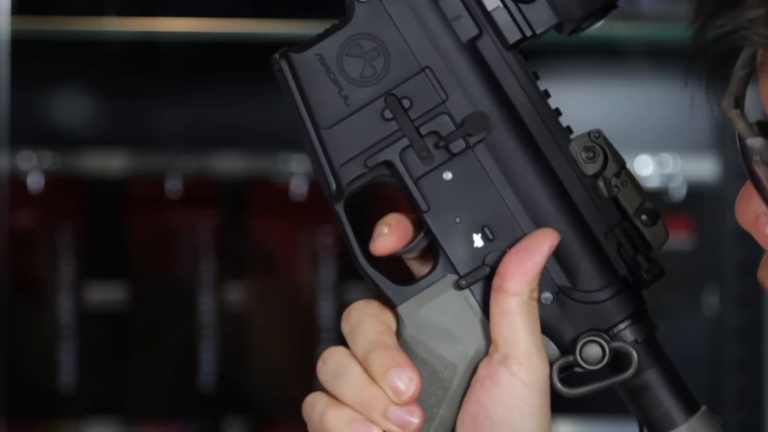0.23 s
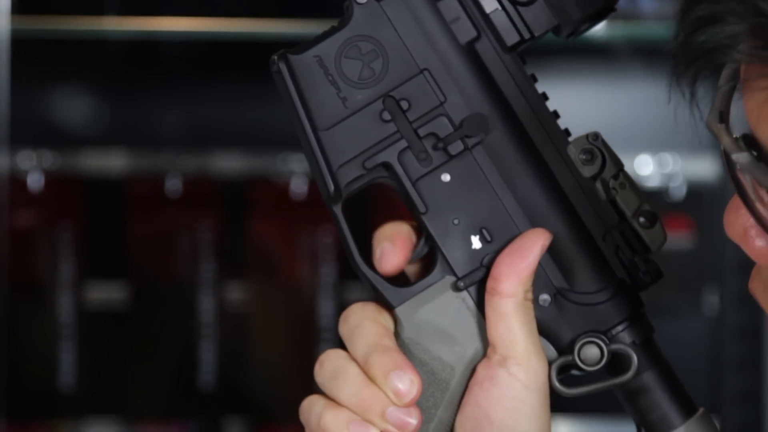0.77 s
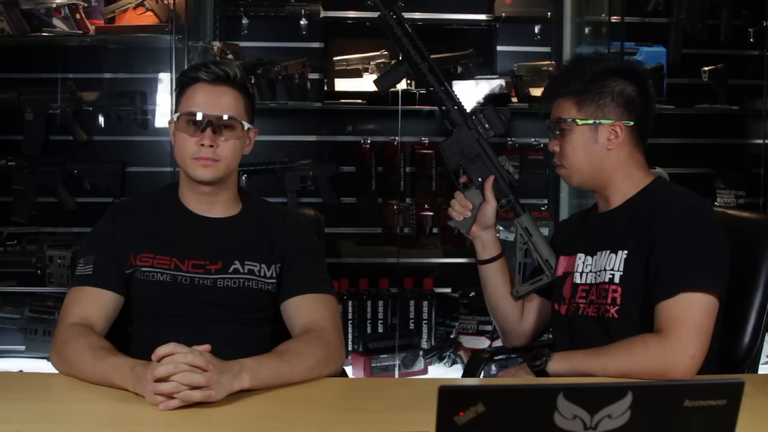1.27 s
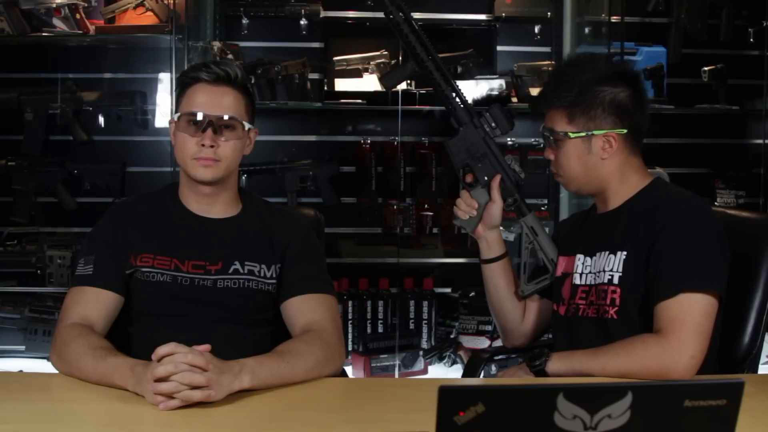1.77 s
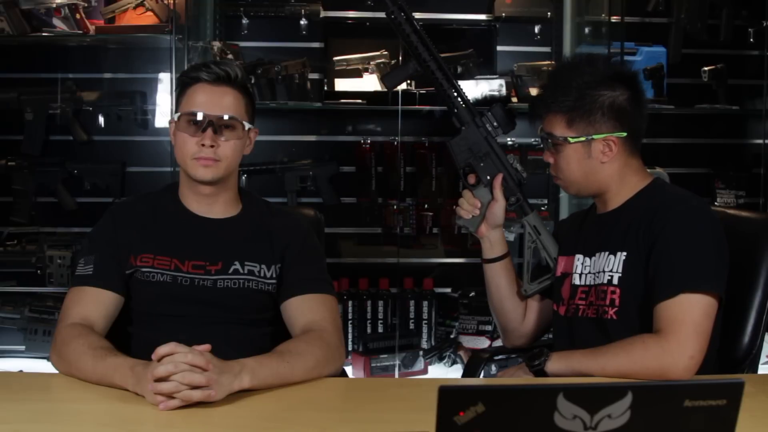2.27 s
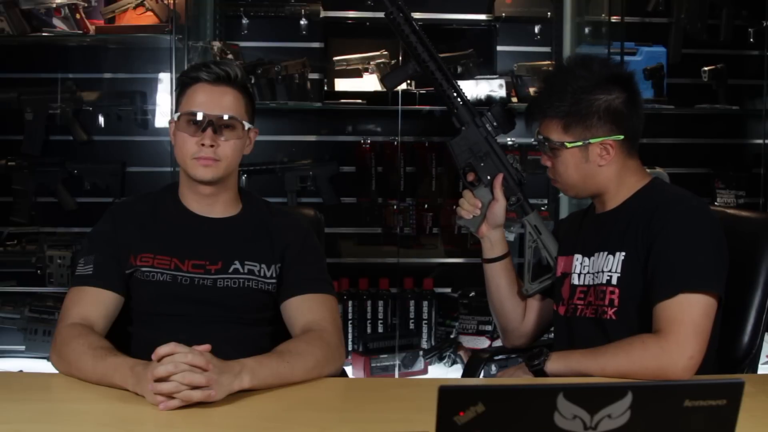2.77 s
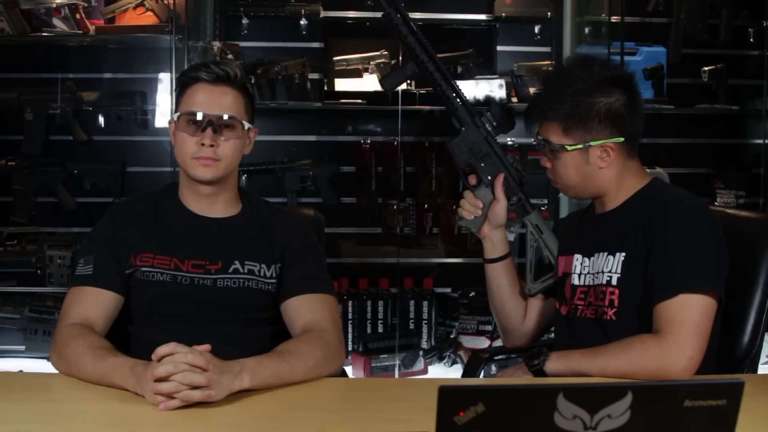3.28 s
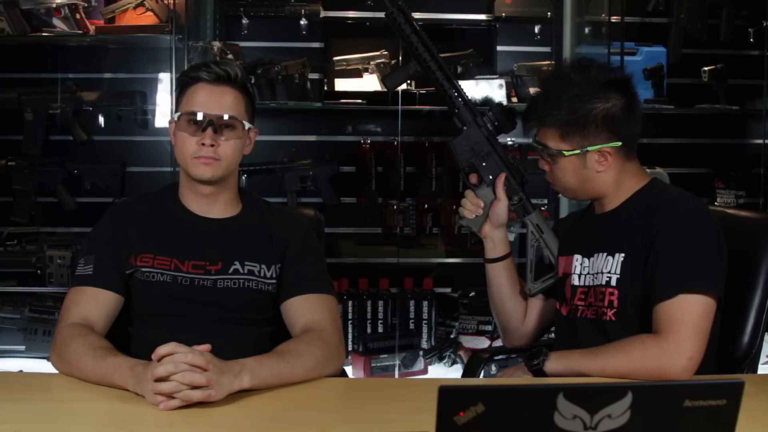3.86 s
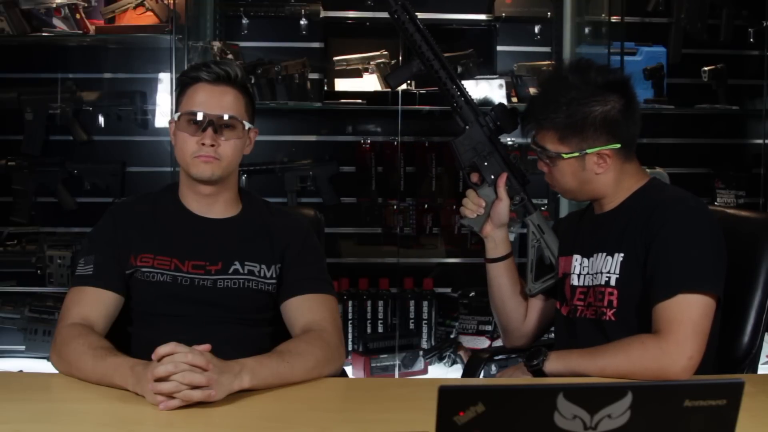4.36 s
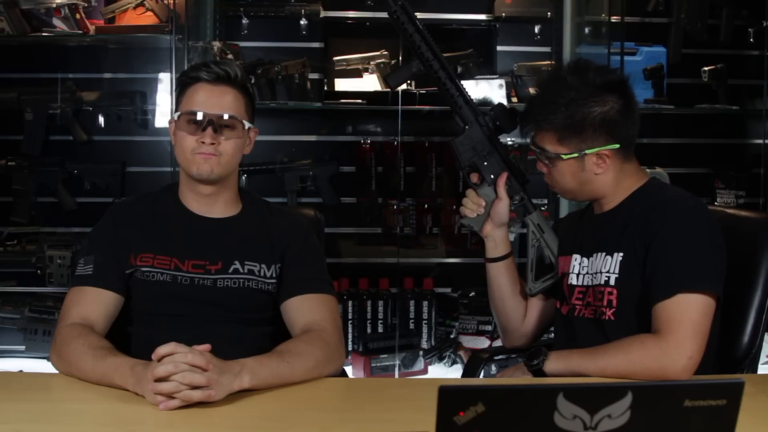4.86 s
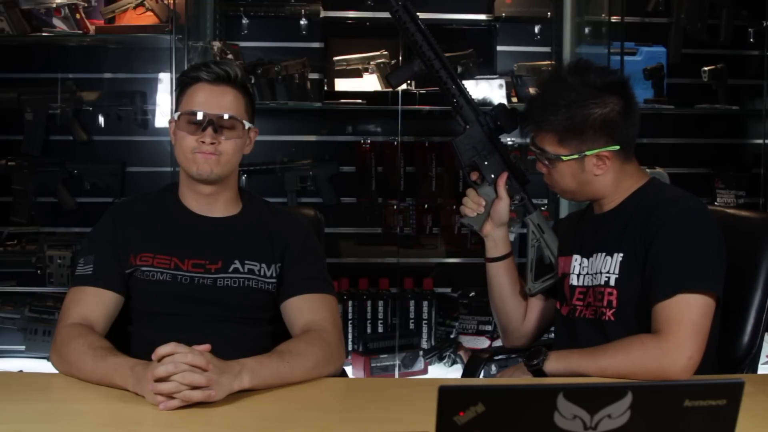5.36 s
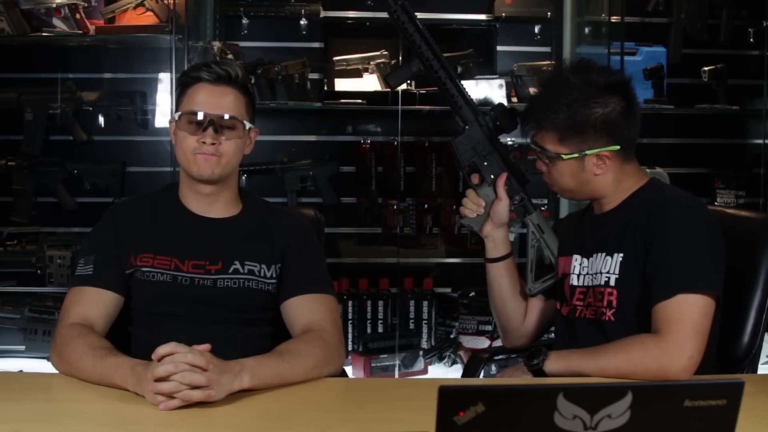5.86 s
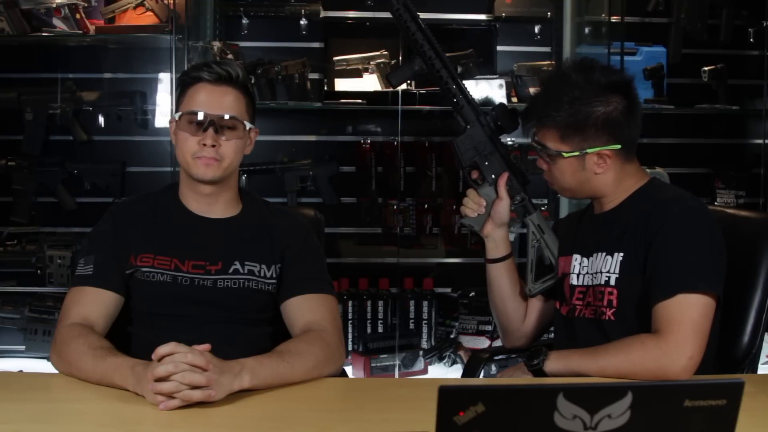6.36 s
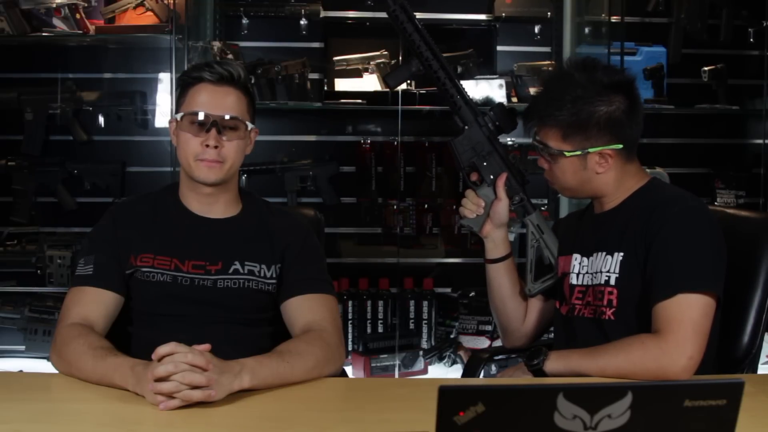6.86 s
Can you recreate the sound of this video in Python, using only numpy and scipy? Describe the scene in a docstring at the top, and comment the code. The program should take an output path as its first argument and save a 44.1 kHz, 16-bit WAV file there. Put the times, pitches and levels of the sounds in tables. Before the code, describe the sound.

Close, loud clacks and air pops from an electric airsoft rifle, triggered as fast as possible in a room with a short echo.

```python
"""A blip of gear whirr snaps into a hard clack: an electric airsoft rifle, close up in a shop room,
fired as fast as a finger can pull. Each shot, the gears wind the piston back, air hisses out, the piston
slams home and the gearbox rebounds. A pellet gives a pop; when none feeds, the open barrel rings instead.
The room answers with a short dense tail and the loud slams overload the input.
Underneath sit a faint room tone and a few soft low thuds."""
import sys
import numpy as np
from scipy import signal
from scipy.fft import rfft, irfft, next_fast_len
from scipy.io import wavfile
from scipy.ndimage import uniform_filter1d

SR = 44100
rng = np.random.default_rng(int(sys.argv[2]) if len(sys.argv) > 2 else 0)


def store_pcm(level_fs):
    """Save levels as 16-bit WAV."""
    pcm = np.round(np.clip(level_fs, -1, 1) * 32767).astype(np.int16)
    wavfile.write(sys.argv[1], SR, np.atleast_2d(pcm).T)


N = 314433

# trigger pulls: t/s, slam level/dB, gear level/dB, barrel ring against the slam/dB
SHOT_CUES = [(0.0206, 5.5, -15, -42), (0.1133, 3.5, -19.5, -38), (0.2378, 3.5, -19.5, -43),
             (0.3445, 4.5, -21, -34), (0.4762, 3.5, -18.5, -41), (0.5858, 2.5, -20.5, -60),
             (0.6993, 2, -21, -42), (0.8218, 2.5, -22.5, -41), (0.9422, 2.5, -19.5, -43),
             (1.073, 3.5, -19.5, -14.5), (1.175, 5.5, -16, -49), (1.2992, 8, -9.5, -34),
             (1.4216, 8, -9, -20), (1.5287, 6, -12.5, -20.5), (1.6473, 5, -15.5, -20),
             (1.7564, 4.5, -17, -28), (1.8683, 4.5, -18, -27), (1.9773, 3.5, -18, -21),
             (2.1011, 3.5, -18, -26), (2.2053, 2.5, -20, -22), (2.322, 3, -19.5, -26),
             (2.4336, 4, -19, -13), (2.5476, 2.5, -19, -13.5), (2.6629, 2.5, -19.5, -24),
             (2.7785, 3, -20, -20), (2.8909, 2.5, -20.5, -25), (3.0065, 3, -20, -29),
             (3.1203, 5.5, -20.5, -14), (3.2341, 2.5, -18, -13.5), (3.348, 1, -21.5, -25),
             (3.5762, 4.5, -18.5, -14), (3.7035, 3.5, -19.5, -22), (3.8217, 2.5, -19.5, -13.5),
             (3.9487, 2, -19, -24), (4.081, 2.5, -21.5, -24), (4.206, 1.5, -20.5, -28),
             (4.3236, 2.5, -21, -34), (4.4519, 2.5, -20.5, -13.5), (4.5676, 2, -20, -39),
             (4.689, 2.5, -21, -14), (4.813, 1.5, -21.5, -21), (5.1559, 5.5, -18, -22),
             (5.2806, 4.5, -15.5, -21), (5.5118, 4.5, -15, -18), (5.659, 5, -15, -13),
             (5.7927, 2.5, -18, -21), (5.9408, 4, -17, -25), (6.0735, 2.5, -19, -20),
             (6.339, 4.5, -19, -24), (6.5008, 3.5, -17, -20), (6.6466, 3.5, -18, -13.5),
             (6.807, 3, -18, -28), (6.9625, 4, -18, -15), (7.11, 3, -18.5, -34)]
# how the balance of each shot drifts over time, shifting after the first string: # t/s, pop f/Hz, then pop/dB,
# thump/dB, knock/dB against the slam, whine/dB against the gears
TONE_OVER_TIME = [(0, 1080, -1.5, -25.5, -9.5, -1), (.95, 1020, 0.5, -25, -9, -1), (1.2, 1060, 1.5, -29, -13.5, -7),
                  (1.28, 984, -1.5, -22, -17.5, -5.5), (2.8, 982, -1.5, -22, -20, -7.5),
                  (4.6, 962, -2.5, -23, -21, -13), (5.4, 980, -1, -21, -19, -15), (7.2, 965, -2, -23, -21, -11)]
# shot-to-shot spread: pop/dB, thump/dB, knock/dB, whine/dB, rebound/dB
SPREAD_DB = [0.52, 0.84, 2.8, 3, 1.35]
# gear resonances in the shell: f/Hz, width/Hz, level/dB
GEAR_PEAKS = [(1030, 540, -4), (1380, 89, -26), (1920, 300, -15), (2464, 1300, 12), (3460, 43, -12),
              (4640, 43, -4), (5840, 250, -6.5), (7000, 130, -30)]
# tone curves: f/Hz, level/dB
GEAR_EQ = [(88, -63), (150, -41), (472, -13.5), (1030, -9.5), (3220, -9), (3620, -3), (6240, -12),
           (7150, -14.5), (15500, -22.5)]  # chattering teeth
AIR_EQ = [(180, -21), (300, -25), (484, 0.5), (969, 1.5), (2210, -3), (3400, 0.5), (5490, -4.5), (7390, -5),
          (9310, -15.5), (15500, -26.5)]  # escaping air
TAIL_EQ = [(60, -26), (300, 14), (450, 2.5), (700, 0.5), (1000, 2), (1400, 3), (2500, 2.5), (3250, 4),
           (3700, 5.5), (5000, 4.5), (8000, 4.5), (16000, 5)]  # the room's answer
ROOM_TONE_EQ = [(20, -19), (60, 1), (300, -5), (2000, -25), (6000, -45), (16000, -59)]  # the quiet room
# the piston head chatters on its pad: t/s after first contact, level/dB
PISTON_HITS = [(0, -1.5), (.0024, -13.5), (.0048, -20)]
# ringing modes: f/Hz, level/dB, t60/s
SHELL_MODES = [(1401, -9, 0.03), (1778, -6.5, 0.018), (2282, -5, 0.016), (2695, -2, 0.022),
               (3305, -1.5, 0.018), (3730, -10, 0.013), (4170, -7, 0.015), (4957, -6, 0.013),
               (5880, -6, 0.0078), (7790, -16, 0.0094)]  # gearbox shell
RECEIVER_MODES = [(770, -15, 0.082), (856, 1, 0.044), (1146, -18, 0.013), (1805, -5.5, 0.031),
                  (2110, -0.5, 0.037), (2563, 1, 0.053)]  # hollow side of the receiver
BARREL_MODES = [(359, -0.5, 0.022), (686, -5, 0.062), (1000, -4, 0.073), (1380, -4, 0.018),
                (1675, -37, 0.0101), (2340, -7, 0.071), (3654, 9, 0.026)]  # open barrel
STOCK_MODES = [(195, 6.5, 0.05), (475, -1, 0.031)]  # stock and grip
SPRING_MODES = [(1376, -6, 0.38), (1760, 4.5, 0.11), (2464, 5, 0.13), (2750, 6, 0.097), (3390, 4, 0.24),
                (3630, -19, 0.083)]  # thin metal of spring and guide
ROOM_MODES = [(111, 5, 0.079), (154.7, -7, 0.46), (204.7, -4.5, 0.23), (250.8, -5.5, 0.39), (234, 2, 0.35),
              (293, -10, 0.55), (369, -21, 0.61), (421.5, -14, 0.38), (444.6, 2.5, 0.16),
              (481.5, -7.5, 0.75), (527, -17, 0.79), (575, -2.5, 0.33), (588, -11.5, 0.58)]  # low end of the room
# cancellation near the table top: f/Hz, width/Hz, depth/0-1
TABLE_NOTCH = (316, 89, 0.65)
# decay of the room tail: f/Hz, t60/s
TAIL_DECAY = [(100, 0.97), (300, 1), (1000, 0.86), (3000, 0.72), (6000, 0.53), (10000, 0.37), (15000, 0.25)]
# soft low thuds: t/s, level/dB, f/Hz
THUD_CUES = [(2.47, -48, 60), (3.065, -40, 55), (4.915, -38, 55), (6.13, -36, 55), (6.745, -35, 55)]

WIND_S, HOME_S = .028, .0027  # wind-up before the piston's release; its flight after
LOADED_DB, EMPTY_DB = -17.5, -13.5  # barrel ring up to which a pellet fed, and from which none did
EMPTY_POP_DB, EMPTY_THUMP_DB, EMPTY_RISE = -18, -16, 0.056  # an empty shot is thinner, its pop sharper
REBOUND_DB, REBOUND_LOSS = -6.5, 0.75  # rebound against the slam; dB lost per dB of harder slam


def amp(db):
    return 10 ** (np.asarray(db) / 20)


def unit(x):
    return x / np.sqrt(np.mean(x ** 2) + 1e-20)


def curve(points, hz):
    """Read (f/Hz, value) points on a log axis."""
    freqs, values = np.transpose(points)
    return np.interp(np.log(hz + 1), np.log(freqs + 1), values)


def filtered(x, response):
    """Shape x with a frequency response."""
    size = next_fast_len(len(x) + 8192)
    return irfft(rfft(x, size) * response(np.fft.rfftfreq(size, 1 / SR)), size)[:len(x)]


def noise(size, eq):
    """Coloured noise of rms 1."""
    return unit(filtered(rng.standard_normal(size), lambda hz: amp(curve(eq, hz))))


def fade(t, start, attack, t60):
    """Silent until start, a short rise, then a fall of 60 dB in t60."""
    age = np.maximum(t - start, 0)
    return (1 - np.exp(-age / attack)) * amp(-60 * age / t60)


def ring(modes, t, start, spread_db, attack=0.00054):
    """Modes struck at start, each at a new strength."""
    return sum(amp(db + rng.normal(0, spread_db)) * fade(t, start, attack, t60)
               * np.sin(2 * np.pi * hz * (t - start)) for hz, db, t60 in modes)


def gear_whirr(size):
    """Gear teeth chatter unevenly through the resonances of the shell."""
    def colour(hz):
        peaks = sum(amp(db) * width / np.hypot(width, 2 * (hz - f)) for f, width, db in GEAR_PEAKS)
        return amp(curve(GEAR_EQ, hz)) * (1.3 + peaks)
    teeth = rng.standard_normal(size)
    flutter_db = 2.1 * unit(uniform_filter1d(rng.standard_normal(size), 40))
    return unit(filtered(teeth * amp(flutter_db), colour))


def wind_up(whine_db):
    """The gears draw the spring back, louder under load; the motor whine climbs, the nozzle snaps back."""
    t = np.arange(round(WIND_S * SR)) / SR
    nozzle = amp(-9) * ring(SHELL_MODES, t, WIND_S - .011 + rng.normal(0, 0.0024), 7.4)
    nozzle *= fade(t, WIND_S - .014, .001, .03)
    pitch_hz = 1200 - 450 * np.exp(-t / 0.01425)
    phase = 2 * np.pi * np.cumsum(pitch_hz) / SR + rng.uniform(0, 2 * np.pi)
    whine = amp(whine_db) * np.exp(-((t - .019) / 0.0076) ** 2) * np.sin(phase)
    load = (1 - np.exp(-(t / 0.0023) ** 2)) * amp(8.2 * (t / WIND_S - 1))
    return load * gear_whirr(len(t)) + whine + nozzle


def run_down(t):
    """Freed of the spring, the gears spin on briefly and stop."""
    return fade(t, 0, 0.0013, 0.29) * gear_whirr(len(t))


def air_blast(t, air, choke, back_s, rebound_db):
    """Air hisses as the piston flies and bursts as it lands; each hit and the rebound add a crack."""
    hiss = amp(-6.5) * fade(t, 0, 0.00053, 0.046) * np.gradient(air)
    burst = amp(-17.5) * fade(t, HOME_S, 0.00066, 0.045) * air * choke
    hits = sum(amp(db) * fade(t, HOME_S + s, 0.00072, 0.016) for s, db in PISTON_HITS)
    hits += amp(rebound_db + 1) * fade(t, back_s, 0.00049, 0.075)
    bright_air = unit(np.diff(air, n=2, prepend=[0, 0]))
    return hiss + burst + amp(-11.5) * hits * bright_air


def piston_slam(t, choke, knock_db):
    """The piston chatters home: the shell clacks and the hollow receiver knocks."""
    clack = sum(amp(db) * ring(SHELL_MODES, t, HOME_S + s, 1.0) for s, db in PISTON_HITS)
    knock = amp(knock_db) * ring(RECEIVER_MODES, t, HOME_S, 0.85)
    return clack * choke + knock * (0.28 + 0.55 * choke)


def pellet_pop(t, hz):
    """Air trapped behind the pellet pops, sagging in pitch as the pellet runs down the barrel."""
    sag = 1 + 0.068 * (np.exp(-t / 0.0028) - .45)
    phase = 2 * np.pi * hz * np.cumsum(sag * (t > HOME_S)) / SR
    return fade(t, HOME_S, 0.00064, t60=0.02) * np.sin(phase)


def barrel_puff(t):
    """One quick push of air with a shallow undershoot."""
    age = np.maximum(t - HOME_S, 0) / 0.00042
    return age * (1 - age / 2) * np.exp(-age)


def low_end(t, thump_db):
    """Stock and grip thump, and the room's low modes boom just behind."""
    thump = amp(thump_db) * ring(STOCK_MODES, t, HOME_S, 0.84, attack=0.0016)
    boom = amp(0.4 * thump_db - 22) * ring(ROOM_MODES, t, HOME_S + 0.00424, 0.31, attack=0.0017)
    return thump + boom


def spring_ring(t, knock_db, barrel_db):
    """Spring and guide ring on, fainter with a strong knock, freer in an empty shot."""
    level_db = -32 - 0.28 * knock_db + 0.076 * barrel_db
    return amp(level_db) * ring(SPRING_MODES, t, HOME_S, 2.2, attack=0.0083)


def rebound(t, air, back_s):
    """The gearbox kicks back with a second clack and a spit of air, and its parts rattle."""
    clack = amp(-2) * ring(SHELL_MODES, t, back_s, 4.4)
    spit = fade(t, back_s, 0.0014, 0.023) * air
    rattle = amp(-5) * fade(t, back_s, 0.0036, 0.16) * gear_whirr(len(t))
    return clack + spit + rattle


def after_tone(t, knock_db, barrel_db, hz=1380, peak_s=0.056):
    """A thin tone swells after the hit."""
    level_db = -37.5 - 0.5 * knock_db + 0.19 * barrel_db + rng.normal(0, 1.7)
    return amp(level_db) * np.exp(-((t - peak_s) / 0.013) ** 2) * np.sin(2 * np.pi * hz * t)


def shot(s, slam_db, gear_db, barrel_db):
    """One shot, balanced by its moment in the string and pellet feed, as stems: struck, noisy (starts WIND_S
    early), body."""
    times, *columns = np.transpose(TONE_OVER_TIME)
    pop_hz, *levels = [np.interp(s, times, column) for column in columns]
    levels.append(REBOUND_DB - REBOUND_LOSS * slam_db)
    pop_db, thump_db, knock_db, whine_db, rebound_db = rng.normal(levels, SPREAD_DB)
    empty = np.clip((barrel_db - LOADED_DB) / (EMPTY_DB - LOADED_DB), 0, 1)

    t = np.arange(SR // 2) / SR
    back_s = rng.normal(.012, 0.000494)  # moment of the rebound
    air = noise(len(t), AIR_EQ)
    choke = 1 / (1 + (t / 0.012) ** 8)  # the piston head settles on its pad and damps the ringing
    slam = piston_slam(t, choke, knock_db)
    pop = amp(pop_db + EMPTY_POP_DB * empty) * pellet_pop(t, pop_hz * (1 + EMPTY_RISE * empty))
    barrel = amp(barrel_db) * ring(BARREL_MODES, t, HOME_S, 0.46)
    struck = slam + (pop + barrel) * choke
    body = amp(barrel_db + 15.5) * barrel_puff(t) + low_end(t, thump_db + EMPTY_THUMP_DB * empty)
    body += spring_ring(t, knock_db, barrel_db) + after_tone(t, knock_db, barrel_db)
    noisy = air_blast(t, air, choke, back_s, rebound_db) + amp(rebound_db) * rebound(t, air, back_s)
    noisy = amp(slam_db) * noisy + amp(gear_db - 0.5) * run_down(t)
    noisy = np.concatenate([amp(gear_db) * wind_up(whine_db), noisy])
    return amp(slam_db) * struck, noisy, amp(slam_db) * body


def table_bounce(hz):
    """The bounce off the table arrives out of step and thins one narrow low band."""
    centre, width, depth = TABLE_NOTCH
    return 1 - depth * 1j * hz * width / (centre ** 2 - hz ** 2 + 1j * hz * width)


def room_tail(x):
    """A dense tail, new on each call, in which each frequency dies at its own speed."""
    hz, t, spectrum = signal.stft(rng.standard_normal(SR * 2 // 3), SR, nperseg=256)
    level_db = curve(TAIL_EQ, hz)[:, None] - 60 * t / curve(TAIL_DECAY, hz)[:, None]
    tail = signal.istft(spectrum * amp(level_db), SR, nperseg=256)[1]
    return signal.fftconvolve(np.pad(x, (350, 0)), tail / np.linalg.norm(tail))  # 8 ms pre-delay


def thuds():
    """Soft low thuds, each about two cycles long."""
    t = np.arange(N) / SR
    return sum(amp(db) * np.exp(-((t - s) / .016) ** 2) * np.sin(2 * np.pi * hz * (t - s))
               for s, db, hz in THUD_CUES)


def scene():
    """The struck parts share one unchanging room; air and gear noise scatter anew with each shot."""
    struck_bus, mix = np.zeros((2, N + 3 * SR))
    for s, slam_db, gear_db, barrel_db in SHOT_CUES:
        struck, noisy, body = shot(s, slam_db, gear_db, barrel_db)
        wet = amp(-9) * room_tail(noisy)
        wet += amp(-21) * room_tail(np.pad(struck, (len(noisy) - len(struck), 0)))
        release = SR + round(s * SR)  # one second of pre-roll
        trigger = release - round(WIND_S * SR)
        struck_bus[release:release + len(struck)] += struck
        mix[release:release + len(body)] += body
        mix[trigger:trigger + len(noisy)] += noisy
        mix[trigger:trigger + len(wet)] += wet
    mix += struck_bus + amp(-10) * room_tail(struck_bus)[:len(mix)]
    rifle = filtered(mix, table_bounce)[SR:SR + N]
    return (rifle + amp(-49) * noise(N, ROOM_TONE_EQ) + thuds())[None]


def record(dry, low_cut_hz=50, top_hz=15850):
    """The microphone sheds the deep bass, the input clips, and the very top is cut away."""
    x = filtered(dry[0], lambda hz: (1j * hz / (low_cut_hz + 1j * hz)) ** 2)
    x = x / (1 + np.abs(x / 1.03) ** 16) ** (1 / 16)
    return np.clip(filtered(x, lambda hz: hz < top_hz), -1, 1)[None]


dry = scene()
out = record(dry)
store_pcm(out)
```